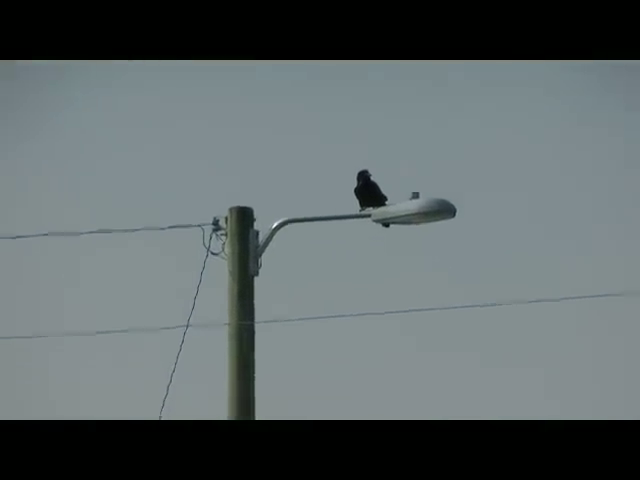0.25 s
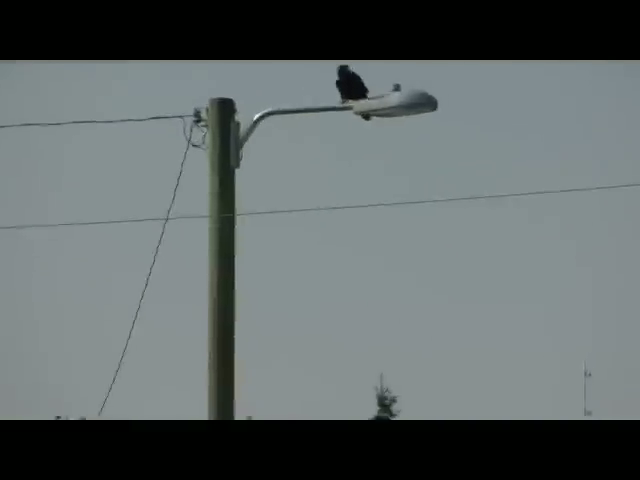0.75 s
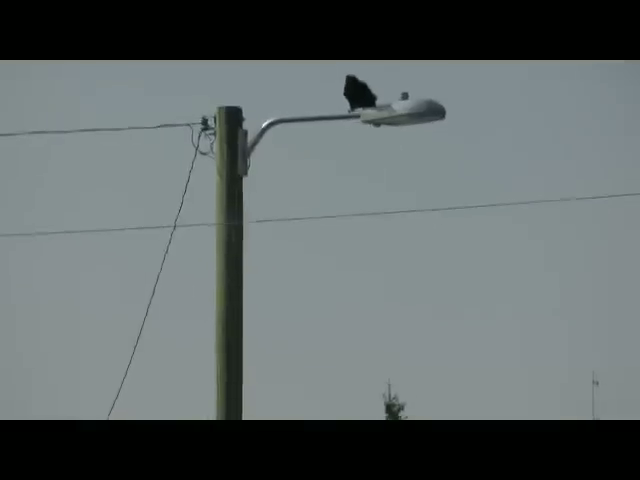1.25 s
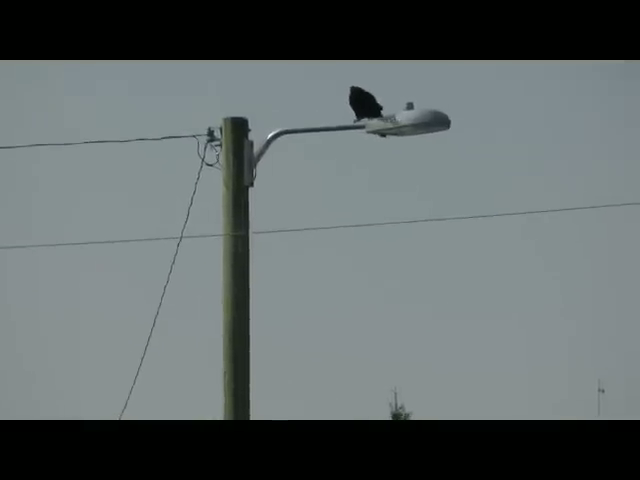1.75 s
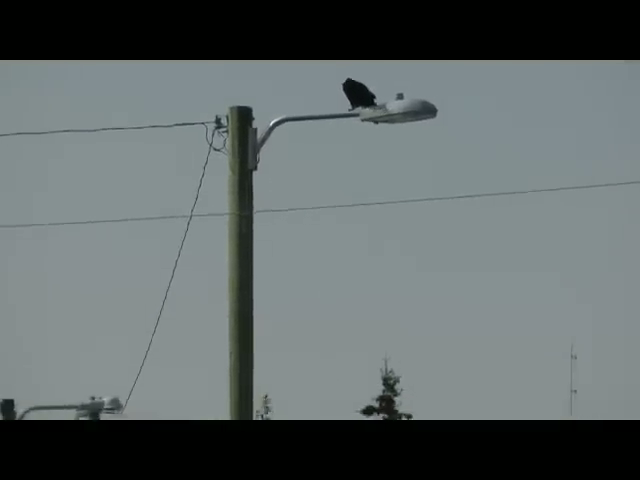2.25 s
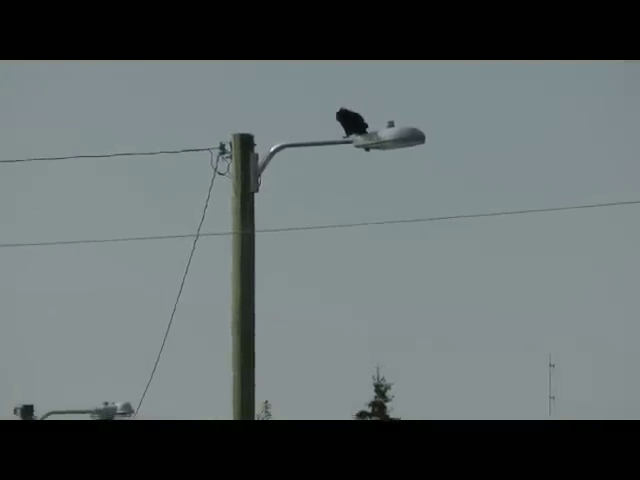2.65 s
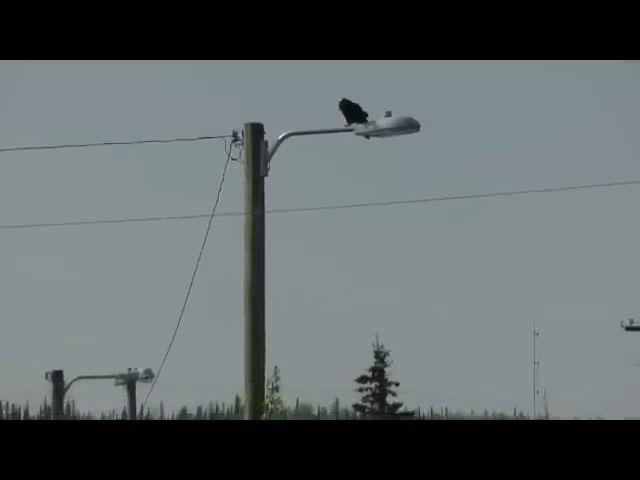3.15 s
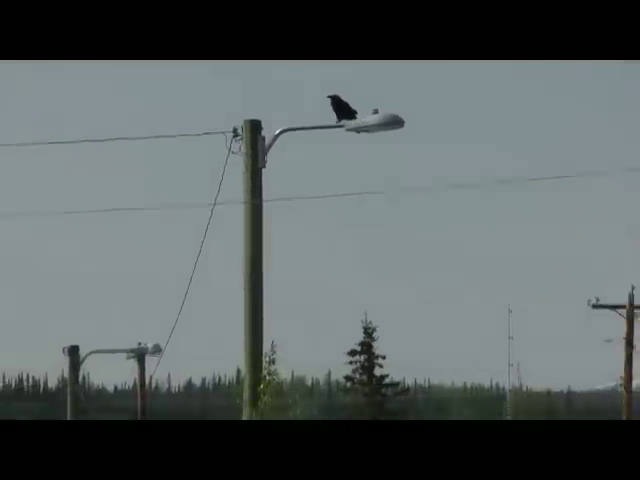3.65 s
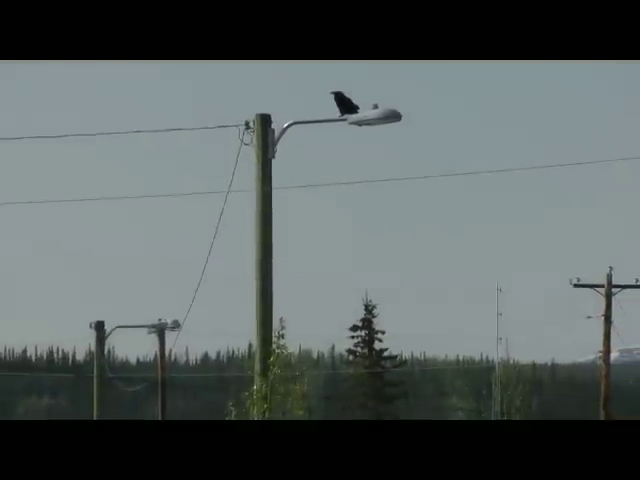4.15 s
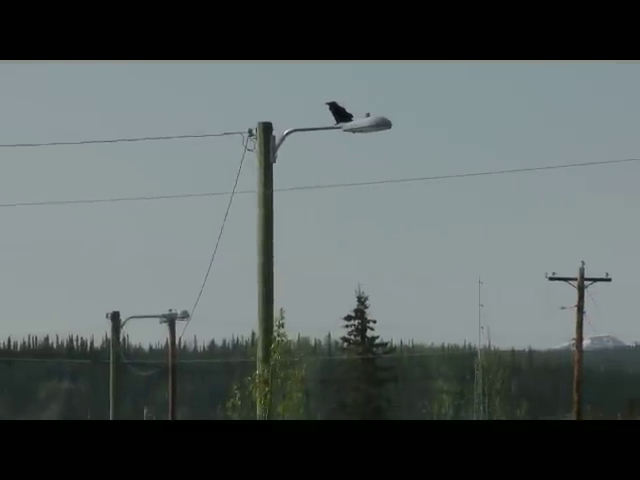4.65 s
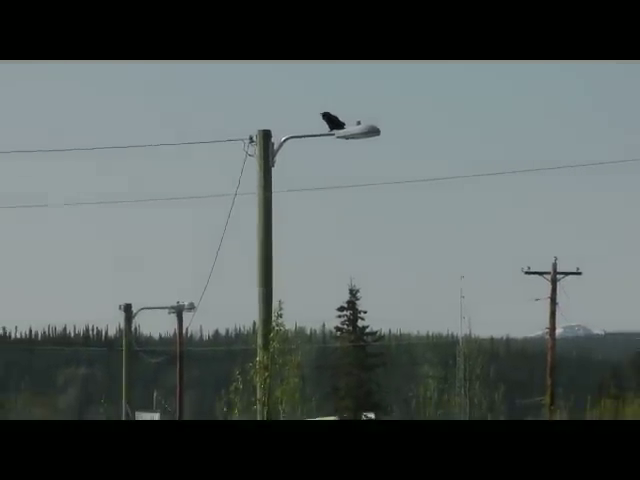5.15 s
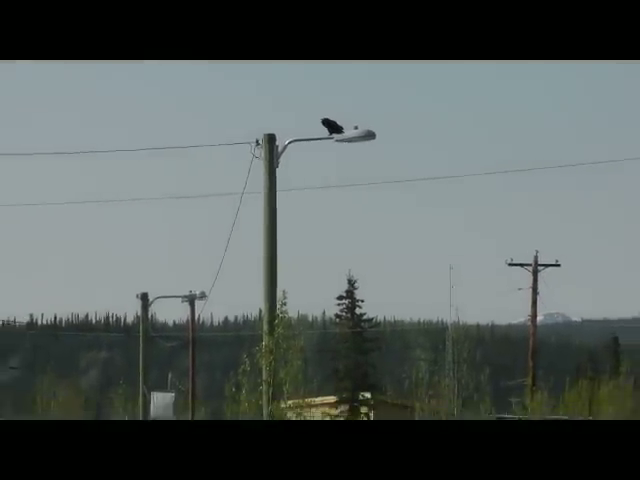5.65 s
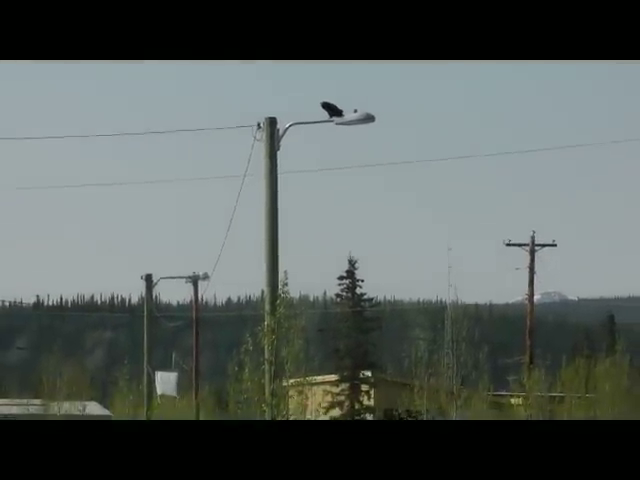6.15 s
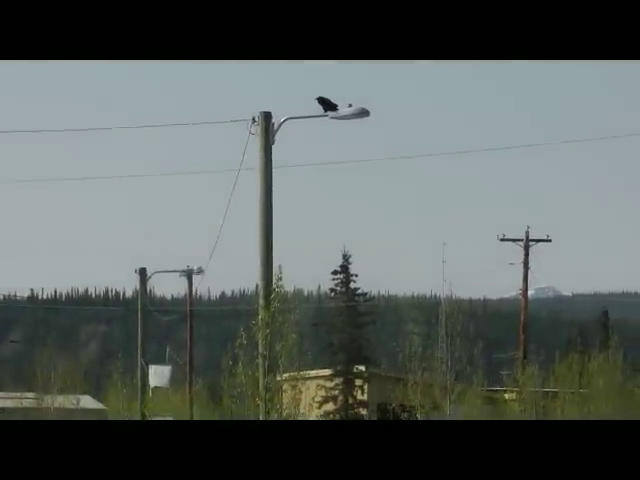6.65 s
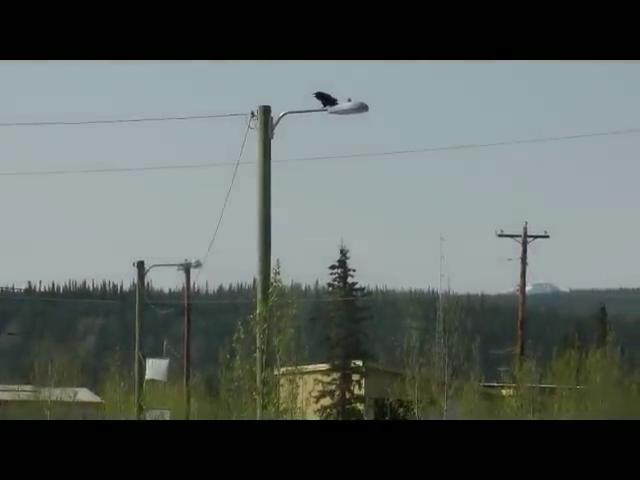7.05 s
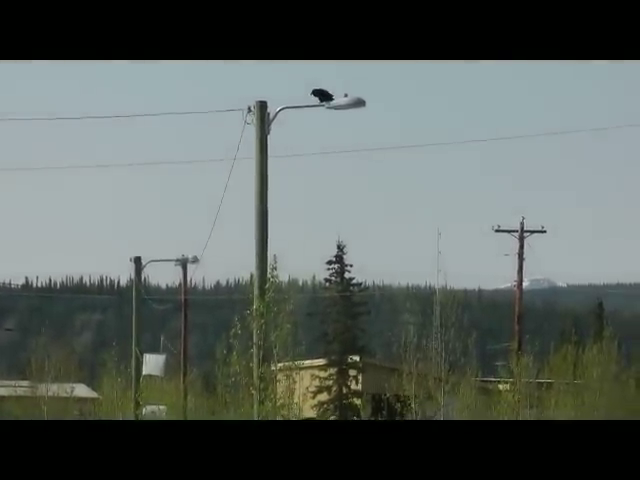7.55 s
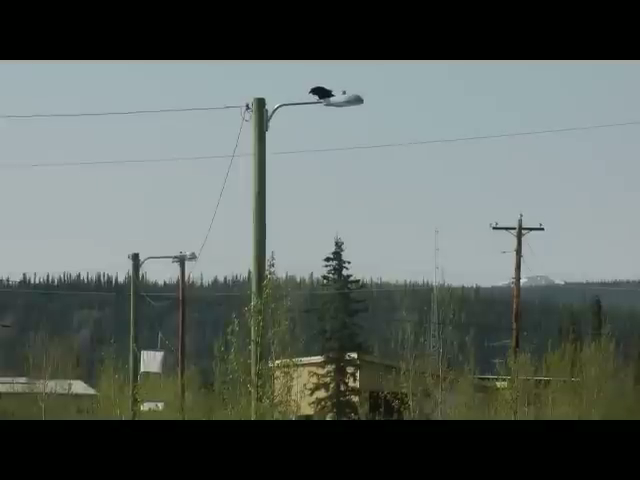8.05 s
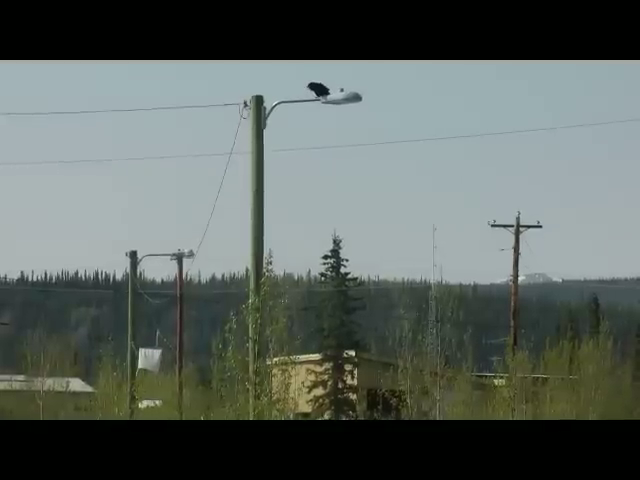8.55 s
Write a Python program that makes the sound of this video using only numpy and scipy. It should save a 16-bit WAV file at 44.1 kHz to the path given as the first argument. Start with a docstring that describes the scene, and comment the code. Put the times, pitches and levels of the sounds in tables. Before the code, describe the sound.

A raven outdoors calls in short hollow pairs during the first few seconds, with one dry rasp among them. After a quiet gap come more paired notes, a second rasp and two brief rattling croaks. Every call returns as quick echoes and a scattered forest tail. Soft air hiss, tiny bird slurs, near rustles and low wind puffs on the microphone surround it; a far engine swells late.

```python
"""A raven calls over open ground edged by forest: mostly paired hollow notes, two dry rasps, two rattling croaks.
Notes and croaks are stacks of harmonics with a hoarse scrape; rasps are snaps ringing an open beak over a low tone.
Each call returns as a few distinct echoes and a long, scattered one built from decaying bands of noise.
Small birds slur downward, ticks and rustles sound near the microphone, and puffs of wind thump on it.
Beneath lie shaped noise for outdoor air, a faint hum of two lines and a far engine that swells up late."""
import sys
import numpy as np
from scipy import signal
from scipy.fft import rfft, irfft, next_fast_len
from scipy.io import wavfile
from scipy.ndimage import uniform_filter1d

SR = 44100
rng = np.random.default_rng(int(sys.argv[2]) if len(sys.argv) > 2 else 0)


def materialize(psi):
    """Save the field psi as 16-bit PCM at rate SR to the path in sys.argv[1].

    A 1-D psi becomes a single channel; in a 2-D psi each row is a channel.
    """
    bounded = np.clip(np.atleast_2d(psi).T, -1, 1)
    quanta = np.round(bounded * 32767).astype(np.int16)
    wavfile.write(sys.argv[1], SR, quanta)


N = 388962
TIME = np.arange(N) / SR

# All levels are relative: each source may add its own trim.
# hollow notes: [t/s, length/s, start f/Hz, middle f/Hz, end f/Hz, place of the crest 0-1, fundamental level/dB,
#   second harmonic level/dB, overtone level/dB, upper edge f/Hz, high beak ring level/dB]
HOLLOW_NOTES = [(1.055, 0.093, 733, 749, 646, 0.37, -44, -31.5, -53.5, 2800, -25),
                (1.171, 0.046, 701, 736, 734, 0.4, -45, -30, -52.5, 3000, -30),
                (1.658, 0.082, 659.7, 729, 726, 0.51, -41, -24, -43, 3000, -18),
                (1.777, 0.053, 749, 743.4, 700, 0.31, -43, -29, -44, 3100, -17),
                (2.166, 0.069, 826, 803, 716, 0.39, -39.5, -32.5, -40, 5000, -21),
                (2.271, 0.028, 818, 765, 710, 0.48, -43.5, -33.5, -49.5, 3270, -36),
                (2.292, .036, 799, 835, 770, 0.4, -41.5, -25, -41, 4800, -38),
                (3.152, .083, 647.6, 701.6, 710, 0.52, -45, -31, -50, 4350, -28),
                (3.281, 0.047, 736, 768, 666, 0.66, -45.5, -41.5, -57, 4040, -35),
                (5.547, .072, 837, 794.5, 805, 0.22, -41, -37.5, -49.5, 4230, -40),
                (5.651, 0.062, 776, 753, 715, .48, -44, -35, -57.5, 3130, -40),
                (6.454, 0.061, 636, 648, 631, 0, -48.5, -43.5, -50.5, 2400, -26),
                (6.535, 0.083, 688, 744.3, 722.5, 1, -41, -28.5, -55, 3800, -26),
                (7.532, 0.14, 640, 611, 573, 0.44, -47, -62, -68, 2525, -35),
                (8.742, 0.08, 707, 680, 670, 0.26, -38.5, -60, -62, 4200, -40)]
# rattling croaks: [t/s, length/s, first beat gap/s, growth of the gap per beat, f/Hz, fundamental level/dB,
#   second harmonic level/dB, overtone level/dB, upper edge f/Hz]
RATTLING_CROAKS = [(7.387, 0.1345, .0191, 1.0, 698.5, -40, -35.5, -48.5, 3080),
                   (8.56, 0.17, .0138, 1.038, 735.6, -39.5, -31, -42, 6500)]
# dry rasps: [t/s, length/s, first snap gap/s, growth of the gap per snap, start f/Hz, end f/Hz, snap level/dB,
#   fundamental level/dB, second harmonic level/dB, tone swell/dB, upper edge at the start f/Hz, its fall/octaves]
DRY_RASPS = [(2.7693, 0.0991, .01275, 0.99, 535.5, 502, -37.5, -55.5, -39.5, 0.5, 9450, 0.55),
             (6.0130, 0.1227, .0175, 0.97, 578, 534.7, -36.5, -48, -39, 9, 5500, 2)]
# throat pips that lead into a croak: [t/s, level/dB]
THROAT_PIPS = [(7.348, -51), (7.367, -51), (8.553, -45), (8.560, -47)]
# weight of the overtones in the throat: [f/Hz, level/dB]
THROAT_COLOUR = [(1900, -2), (2250, -1), (2520, 0), (2780, -6), (3020, -2), (3280, 3), (3500, 2),
                 (3780, -12), (4200, -4), (4600, -14), (5000, -13), (5600, -21), (9000, -27)]
# resonances of the hoarse scrape in notes and croaks: [f/Hz, width/Hz, level/dB]
HOARSE_MODES = [(1030, 44, -10.5), (1770, 62, 1), (2130, 67, -2), (2593, 116, 2.5), (3520, 340, -9),
                (3920, 17, -2), (5480, 270, -20)]
# open beak and throat during a rasp: [f/Hz, width/Hz, level/dB]
OPEN_BEAK_MODES = [(578, 42, -1), (1090, 92, 7), (1365, 260, -2), (1630, 46, -3), (2360, 28, 1),
                   (2615, 120, 0.5), (3163, 210, 4), (3290, 27, 0), (4030, 110, -5), (4620, 150, -6),
                   (5700, 140, -6), (7700, 1700, -21.5)]
# left minus right for the raven: [f/Hz, level/dB]
RAVEN_PAN = [(400, -6), (720, -9.5), (1050, -4), (1450, -1.5), (1650, -.3), (2400, -3), (4400, -4.5),
             (8000, -7)]
# phase by which the left port hears the raven earlier: [f/Hz, phase/rad]
RAVEN_PHASE = [(700, 0.96), (1100, -0.7), (1400, 0.85), (1800, -0.18), (2300, 0.33), (3100, 1),
               (4400, 0.79)]
# single echoes from ground and buildings: [delay/s, level/dB]
SINGLE_ECHOES = [(.024, -20), (.066, -24.5), (.092, -44), (.135, -61)]
# scattered echo from the forest, per band: [f/Hz, level/dB, time to fall 60 dB/s]
FOREST_ECHO = [(480, -14, 2.9), (804, -15.5, 1.64), (1134, -8.5, 2.57), (1450, -21, 1.53),
               (2230, -9.5, 1.2), (3180, -14, 1), (6100, -17, .6)]
# left minus right for the echoes and small birds: [f/Hz, level/dB]
FAR_PAN = [(700, -13.5), (1400, -10), (3500, -7)]
# small birds far away: [t/s, length/s, start f/Hz, level/dB]
SMALL_BIRDS = [(0.547, 0.034, 3800, -64), (0.723, 0.052, 4270, -63), (0.763, .028, 3920, -62),
               (0.88, 0.043, 3420, -59), (0.923, 0.038, 3400, -61), (1.029, 0.041, 3550, -57),
               (7.086, 0.17, 2800, -63)]
# faint dry ticks near the microphone: [t/s, level/dB]
DRY_TICKS = [(1.759, -47), (5.878, -55), (5.884, -46), (6.238, -49.5)]
# their resonances: [f/Hz, width/Hz, level/dB]
DRY_TICK_MODES = [(2800, 1600, 15), (7500, 2800, 7)]
# faint rustles near the microphone: [t/s, level/dB]
NEAR_RUSTLES = [(0.15, -67), (0.515, -59), (0.965, -61), (1.125, -57.5), (1.17, -58), (1.45, -76),
                (1.61, -59.5), (4.31, -64.5), (4.82, -63.5), (7.15, -64)]
# their resonances: [f/Hz, width/Hz, level/dB]
NEAR_RUSTLE_MODES = [(2400, 1000, 0.97), (4930, 580, 1), (7360, 530, -4.8)]
# wind puffs on the microphone: [t/s, level/dB]
WIND_PUFFS = [(0.25, -58), (3.49, -48), (3.62, -54), (4.30, -63), (4.62, -50), (5.78, -53.5), (6.25, -51),
              (7.60, -53), (8.68, -53)]
# their low resonance: [f/Hz, width/Hz, level/dB]
WIND_PUFF_MODES = [(42.3, 14.5, 0)]
# far engine: [t/s, f/Hz, level/dB]
FAR_ENGINE = [(0, 80, -75), (5.6, 76, -85), (6.2, 70, -68), (7.0, 71, -63), (7.6, 73.7, -65.5),
              (8.82, 75, -62.5)]
# hum lines: [f/Hz, level/dB]
HUM_LINES = [(426, -77.5), (855, -73)]
# spectrum of outdoor air and microphone hiss: [f/Hz, level per Hz/dB]
AIR_SPECTRUM = [(15, -21), (25, 1), (50, -6.5), (80, 0), (180, -2), (300, -5), (420, -9), (480, -14.5),
                (600, -12.5), (820, -10.5), (950, -21.5), (1620, -14), (3720, -17), (10100, -25),
                (15500, -28)]
# stereo width of the air: [f/Hz, side minus mid level/dB]
AIR_WIDTH = [(30, -14), (70, -5.5), (130, -3.5), (260, 0), (500, 10.5), (1000, 4.5), (3000, -1.5),
             (8000, -1.5), (15000, 2)]
# left minus right for the air: [f/Hz, level/dB]
AIR_BALANCE = [(60, 1), (110, -2.5), (200, 1), (380, -1.5), (700, -6.5), (1290, -4.5), (2380, -5),
               (4400, -8.5), (8120, -6.5), (15000, -25.5)]
# air over time: [t/s, low air level/dB, hiss level/dB]
AIR_LEVELS = [(0.0, -66, -73.5), (0.64, -69, -72.5), (1.84, -66, -71), (4.52, -67, -73), (8.55, -66, -72),
              (8.82, -66, -71.5)]

# a note's edges, and how far each part of the voice sinks away from the crest
ATTACK_S, RELEASE_S = 0.0068, 0.016
SCOOP_S_PER_HZ = 0.00015   # a note that scoops up into its pitch also speaks more slowly
FUNDAMENTAL_SWELL_DB, SECOND_SWELL_DB, OVERTONE_SWELL_DB = 8, 16, 21
BEAT_S, CROAK_CREST = 0.019, 0.52   # length of a beat; place of the loudest beat 0-1
SNAP_CREST, TONE_CREST = 0.4, 0.52   # the snaps peak first, the tone later: place in the rasp 0-1
# the beak's opening sets an upper edge to the overtones; wide open, it adds a high ring
EDGE_STEEPNESS, RING_HZ, RING_WIDTH_OCTAVES = 8.7, 5920, 0.21
SLUR_FALL = 0.14   # share of its pitch that each small bird's slur drops
CUTOFF_HZ = 15750


def notes(waver=.007, waver_db=.7):
    """Clear notes, each one arch of pitch and effort; the higher partials swell most."""
    out, hoarse = np.zeros(N), np.zeros(N)
    for (s, length, start_hz, middle_hz, end_hz, crest,
         first_db, second_db, overtones_db, edge_hz, ring_db) in HOLLOW_NOTES:
        on = (TIME > s) & (TIME < s + length)
        age = TIME[on] - s
        part = age / length
        bend = np.polyfit([0, .5, 1], [start_hz, middle_hz, end_hz], 2)
        pitch = np.polyval(bend, part) * (1 + waver * drift(111.6, len(age)))
        attack = ATTACK_S + SCOOP_S_PER_HZ * max(middle_hz - start_hz, 0)
        edges = np.minimum(age / attack, (length - age) / RELEASE_S)
        gate = np.sin(np.pi / 2 * np.clip(edges, 0, 1))
        second_level = from_db(second_db + waver_db * drift(90, len(age)))
        first = gate * from_db(first_db) * arch(part, crest, FUNDAMENTAL_SWELL_DB)
        second = gate * second_level * arch(part, crest, SECOND_SWELL_DB)
        upper = gate * from_db(overtones_db) * arch(part, crest, OVERTONE_SWELL_DB)
        out[on] += syrinx(pitch, first, second, upper, edge_hz, jitter=.006, shimmer=.03, ring_db=ring_db)
        hoarse[on] += upper
    return out + from_db(-16.0) * resonate(hoarse * rng.standard_normal(N), HOARSE_MODES)


def croaks(sag=.07, skew=.5, scatter=.018):
    """The voice is chopped into beats; each swells fast and sags in pitch as the pressure drops."""
    out, hoarse = np.zeros(N), np.zeros(N)
    for s, length, gap, growth, pitch, first_db, second_db, overtones_db, edge_hz in RATTLING_CROAKS:
        ages = beat_times(length, gap, growth)
        for age in ages:
            on = (TIME > s + age) & (TIME < s + age + BEAT_S)
            part = (TIME[on] - s - age) / BEAT_S
            swell = np.sin(np.pi * part ** skew)
            push = from_db(-9) if age == ages[-1] else 1   # the last beat runs out of air
            place_in_call = age / length
            first = push * from_db(first_db) * arch(place_in_call, CROAK_CREST, depth_db=4) * swell
            second = push * from_db(second_db) * arch(place_in_call, CROAK_CREST, depth_db=11.5) * swell ** 2
            upper = push * from_db(overtones_db) * arch(place_in_call, CROAK_CREST, depth_db=15)
            glide = pitch * (1 + scatter * rng.standard_normal() - sag * (part - skew))
            overtones = upper * swell ** 2 * from_db(0.5)
            out[on] += syrinx(glide, first, second, overtones, edge_hz, jitter=.018, shimmer=.2, odd_db=-13)
            hoarse[on] += upper * np.sqrt(swell) * (1 - part)   # the scrape leans to the beat's opening
    scrape = eased(hoarse, 0.003) * rng.standard_normal(N)
    return out + from_db(4.0) * resonate(scrape, HOARSE_MODES)


def rasps(decay=.0037, rise=.0008, click=3.0, tone_rise=.006):
    """Membranes snap in a quick run: click, short scrape and throb of low tone, duller as the beak closes."""
    drive, tone = np.zeros(N), np.zeros(N)
    t = TIME[:SR // 20]
    throb = t / tone_rise * np.exp(1 - t / tone_rise)
    for (s, length, gap, growth, start_hz, end_hz, snap_db,
         first_db, second_db, swell_db, top_hz, closing) in DRY_RASPS:
        pressure = np.zeros(N)
        for age in beat_times(length, gap, growth):
            part, start = age / length, int((s + age) * SR)
            snap = (1 - np.exp(-t / rise)) * np.exp(-t / decay) * rng.standard_normal(len(t))
            snap[0] += click
            edge_hz = min(top_hz / 2 ** (closing * part ** 2), SR / 2 - 1)
            dulled = signal.sosfilt(signal.butter(2, edge_hz, fs=SR, output="sos"), snap)
            drive[start:start + len(t)] += from_db(snap_db) * arch(part, SNAP_CREST, depth_db=5.5) * dulled
            pressure[start:start + len(t)] += arch(part, TONE_CREST, swell_db) * throb
        pitch = np.interp(TIME, [s, s + length], [start_hz, end_hz]) * (1 + .03 * drift(260, N))
        phase = 2 * np.pi * np.cumsum(pitch) / SR
        tone += pressure * (from_db(first_db) * np.cos(phase) + from_db(second_db) * np.sin(2 * phase))
    return from_db(6.5) * resonate(drive, OPEN_BEAK_MODES) + tone


def pips(hz=1720, length=0.0089):
    """Tiny hollow pips as the throat starts to move: sine bursts with a quick rise."""
    out = np.zeros(N)
    age = TIME[:int(length * SR)]
    pip = np.sin(np.pi * np.sqrt(age / length)) ** 2 * np.sin(2 * np.pi * hz * age)
    for s, db in THROAT_PIPS:
        out[int(s * SR):][:len(age)] += from_db(db + 7) * pip
    return out


def syrinx(pitch, first, second, upper, edge_hz, jitter, shimmer, ring_db=-60, odd_db=0, count=13):
    """A harmonic voice: fundamental, second harmonic and overtones coloured by throat and beak."""
    pitch = pitch * (1 + jitter * drift(450, len(pitch)))
    phase = 2 * np.pi * np.cumsum(pitch) / SR
    orders = np.arange(2, count)[:, None] + 1   # third harmonic upward
    hz = orders * pitch
    flutter_db = 3.5 * np.array([drift(60, len(pitch)) for order in orders])
    throat = from_db(at_hz(THROAT_COLOUR, hz)) / np.hypot(1, (hz / edge_hz) ** EDGE_STEEPNESS)
    ring = from_db(ring_db) * np.exp(-(np.log2(hz / RING_HZ) / RING_WIDTH_OCTAVES) ** 2)
    weights = (throat + ring) * from_db(odd_db * (orders % 2) + flutter_db)
    # normalised, so `upper` alone sets the overtones' level
    overtones = (weights * np.cos(orders * phase)).sum(axis=0) / np.sqrt((weights ** 2).sum(axis=0))
    voice = first * np.cos(phase) + second * np.sin(2 * phase) + upper * overtones
    return np.sqrt(2) * voice * (1 + shimmer * drift(250, len(pitch)))


def arch(part, crest, depth_db):
    """Effort over a call: gain 1 at the crest, depth_db lower at the farther end."""
    return from_db(-depth_db * ((part - crest) / max(crest, 1 - crest)) ** 2)


def beat_times(length, gap, growth, unevenness=0.00033):
    """Ages of the beats in a call: gaps grow by a fixed ratio, then each beat is nudged at random."""
    ages = np.r_[0, np.cumsum(gap * growth ** np.arange(16))]
    ages = np.abs(ages + unevenness * rng.standard_normal(len(ages)))
    return ages[ages < length]


def surroundings(bird, grain_db=1.5, build_up=.015):
    """A few distinct echoes, then a dense scattered one from the trees, each band dying at its own rate."""
    t = TIME[:int(2.5 * SR)]
    response = np.zeros((2, len(t)))
    clumps = from_db(grain_db * drift(36.8, len(t))) * (1 - np.exp(-t / build_up))
    for hz, db, t60 in FOREST_ECHO:
        # one scatter shared by both sides, plus a little of each side's own
        scatter = rng.standard_normal(len(t)) + 0.35 * rng.standard_normal((2, len(t)))
        envelope = clumps * from_db(-60 * t / t60)
        tail = rms_one(scatter) * envelope / np.linalg.norm(envelope)
        response += from_db(db) * band(tail, hz / 1.21, hz * 1.211)
    for delay, db in SINGLE_ECHOES:
        response[:, int(delay * SR)] += from_db(db)
    return signal.fftconvolve(bird[None], response, axes=1)[:, :N]


def twitter():
    """Thin, wavering downward slurs of small birds: gliding sines under a smooth swell."""
    out = np.zeros(N)
    for s, length, hz, db in SMALL_BIRDS:
        count = int(max(length, .01) * SR)
        pitch = hz * np.linspace(1, 1 - SLUR_FALL, count) * (1 + 0.02 * drift(250, count))
        slur = np.hanning(count) * np.sin(2 * np.pi * np.cumsum(pitch) / SR)
        out[int(s * SR):][:count] += from_db(db - 2) * slur
    return out


def ticks():
    """Dry ticks near the microphone: noise that rises at once and dies in milliseconds."""
    return bursts(DRY_TICKS, DRY_TICK_MODES, rise=0.00039, decay=0.003)


def rustles():
    """Rustles near the microphone: softer-edged gushes of bright noise."""
    return bursts(NEAR_RUSTLES, NEAR_RUSTLE_MODES, rise=.015, decay=0.015)


def wind():
    """Low puffs on the microphone: the same moments on both sides, with separate turbulence."""
    return np.array([bursts(WIND_PUFFS, WIND_PUFF_MODES, rise=0.023, decay=0.025) for side in range(2)])


def engine():
    """A far engine: a low drone with a weaker partial at one and a half times its pitch."""
    pitch, db = curves(FAR_ENGINE, TIME)
    phase = 2 * np.pi * np.cumsum(pitch * (1 + 0.016 * drift(4.4, N))) / SR
    half_order = from_db(-9.0) * np.sin(phase + phase / 2) * (1 + .5 * drift(2.1, N))
    drone = np.sin(phase) + half_order
    return np.sqrt(2) * from_db(db) * drone * (1 + 0.41 * drift(10, N))


def hum():
    """Two faint, slightly wavering lines about an octave apart, leaning left."""
    lines = 0
    for hz, db in HUM_LINES:
        pitch = hz * (1 + 0.00405 * drift(30, N))
        lines = lines + from_db(db) * np.sin(2 * np.pi * np.cumsum(pitch) / SR)
    return np.sqrt(2) * lines * (1 + 0.082 * drift(7.8, N)) * from_db([[1.5], [-1.5]])


def air(low_db=0.0, hiss_db=1.5):
    """Soft outdoor rumble that merges into hiss: shaped noise split in two, each part riding its own level."""
    hz = np.fft.rfftfreq(N, 1 / SR)
    mid, side = rfft(rng.standard_normal((2, N))) * from_db(at_hz(AIR_SPECTRUM, hz))
    mid, side = irfft(mid, N), irfft(side * from_db(at_hz(AIR_WIDTH, hz)), N)
    both = place(mid + side * np.array([[1], [-1]]), AIR_BALANCE)
    low = signal.sosfilt(signal.butter(1, 700, fs=SR, output="sos"), both)
    rumble_db, treble_db = curves(AIR_LEVELS, TIME)
    mono = both.mean(axis=0)
    rumble = low * from_db(rumble_db + low_db) / band(mono, 136, 450).std()
    hiss = (both - low) * from_db(treble_db + hiss_db) / band(mono, 7920, 17900).std()
    return rumble + hiss


def bursts(events, modes, rise, decay):
    """Short gushes of turbulence that ring a set of resonances."""
    envelope = np.zeros(N)
    for s, db in events:
        start = int(s * SR)
        age = TIME[:min(N - start, int(10 * (rise + decay) * SR))]
        shape = (1 - np.exp(-age / rise)) * np.exp(-age / decay)
        envelope[start:start + len(age)] += from_db(db) * shape / shape.max()
    return resonate(envelope * rng.standard_normal(N), modes)


def resonate(x, modes):
    """Parallel resonances, each applied twice for dark valleys; white noise roughly keeps its power."""
    out, power = 0, 0
    x = x + 1e-18 * rng.standard_normal(x.shape)   # inaudible floor
    for hz, width, db in modes:
        r = np.exp(-2 * np.pi * width / SR)
        section = [(1 - r * r) / 2, 0, -(1 - r * r) / 2, 1, -2 * r * np.cos(2 * np.pi * hz / SR), r * r]
        out = out + from_db(db) * signal.sosfilt([section, section], x)
        power += from_db(db) ** 2 * np.pi * width / SR
    return out / np.sqrt(power)


def place(x, pan, phase=None):
    """Share each frequency between left and right, in level and in phase."""
    size = next_fast_len(N + SR // 10)
    hz = np.fft.rfftfreq(size, 1 / SR)
    ratio = from_db(at_hz(pan, hz))
    turn = np.exp(.5j * at_hz(phase, hz)) if phase is not None else np.ones(len(hz))
    sides = np.array([ratio * turn, 1 / turn]) * 2 / (1 + ratio)
    return irfft(rfft(x, size) * sides, size)[:, :N]


def band(x, low_hz, high_hz):
    """Butterworth band-pass."""
    return signal.sosfilt(signal.butter(2, [low_hz, min(high_hz, SR / 2 - 1)], "band", fs=SR, output="sos"), x)


def drift(rate, count):
    """Random wander about zero: straight lines between `rate` unit-spread random points a second."""
    t = np.arange(count) / SR * rate
    knots = rng.standard_normal(int(t[-1]) + 2)
    return np.interp(t, np.arange(len(knots)), knots)


def curves(rows, t):
    """Every column of a table after the first, joined by straight lines in time."""
    s, *columns = np.transpose(rows)
    return [np.interp(t, np.sort(s), c) for c in columns]


def at_hz(points, hz):
    """Read a spectrum on a log-frequency axis."""
    f, value = np.transpose(points)
    return np.interp(np.log(np.maximum(hz, 1)), np.log(f), value)


def eased(x, seconds):
    """Round the corners of a control with a moving average."""
    return uniform_filter1d(x, max(1, int(seconds * SR)))


def rms_one(x):
    """Scale to unit rms."""
    return x / np.sqrt(np.mean(x ** 2) + 1e-20)


def from_db(db):
    """Decibels to gain."""
    return 10 ** (np.asarray(db) / 20)


def scene():
    """The raven and its echoes over the quiet background."""
    raven = notes() + croaks() + rasps() + pips()
    direct = place(raven, RAVEN_PAN, RAVEN_PHASE)
    far = place(surroundings(raven) + twitter(), FAR_PAN)
    near = (ticks() + rustles()) * from_db([[-3], [2]])   # leaning right
    return direct + far + near + wind() + engine() + hum() + air()


def record(dry):
    """The recorder cuts the top steeply."""
    return signal.sosfilt(signal.ellip(12, .1, 70, CUTOFF_HZ, fs=SR, output="sos"), dry)


dry = scene()
out = record(dry)
materialize(out)
```